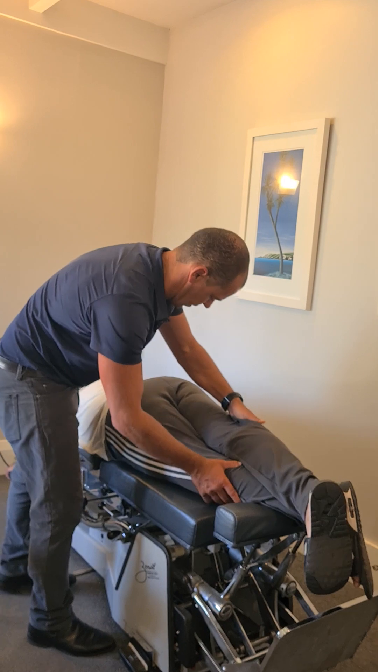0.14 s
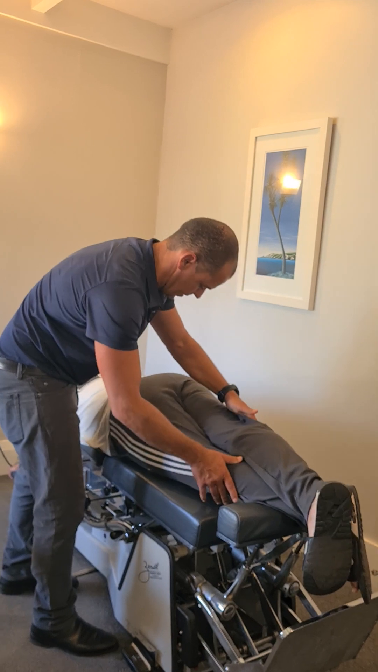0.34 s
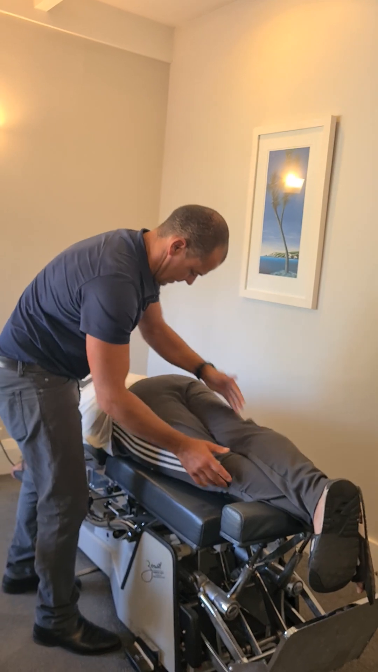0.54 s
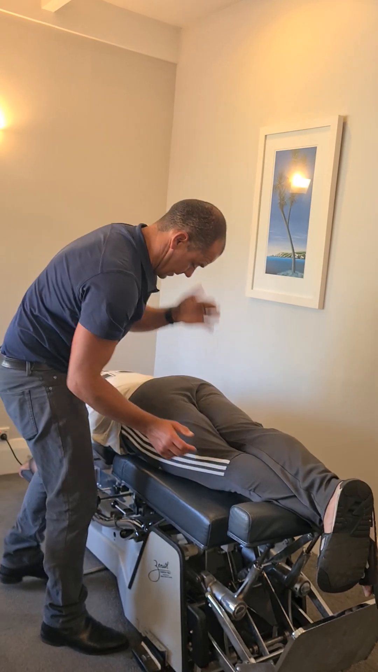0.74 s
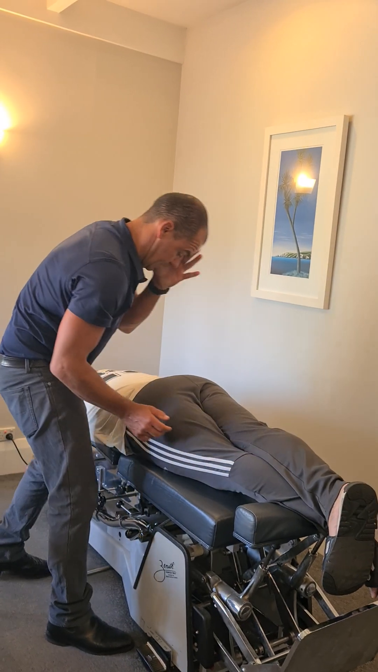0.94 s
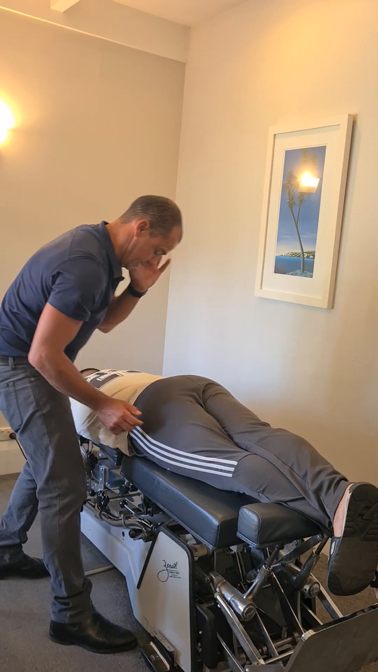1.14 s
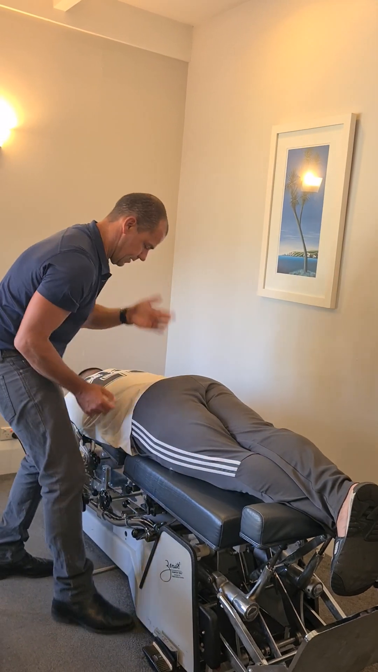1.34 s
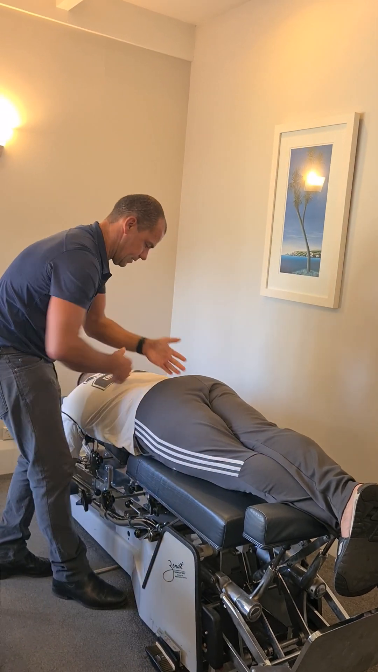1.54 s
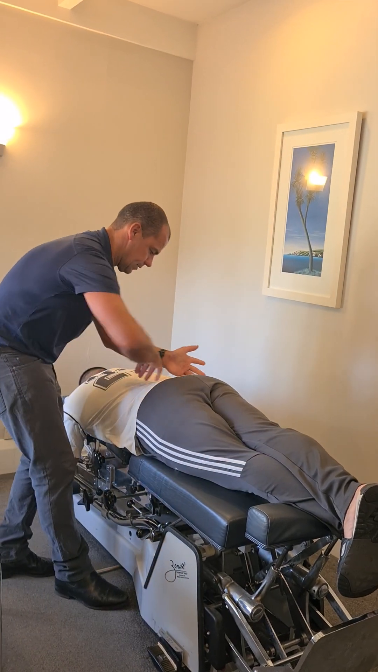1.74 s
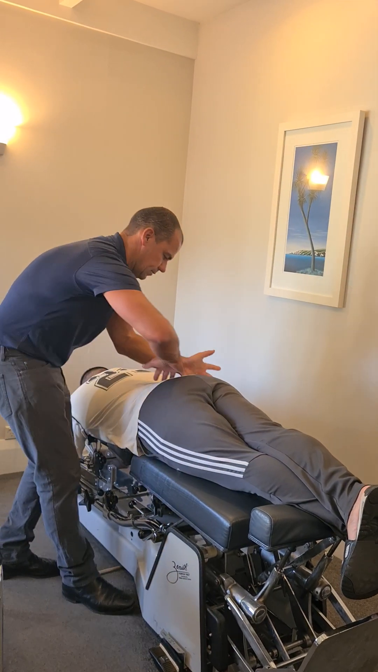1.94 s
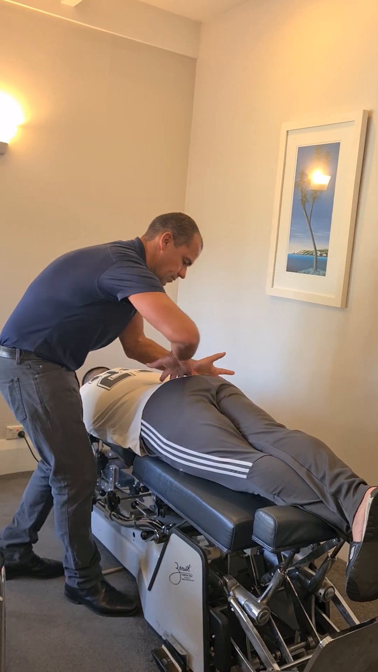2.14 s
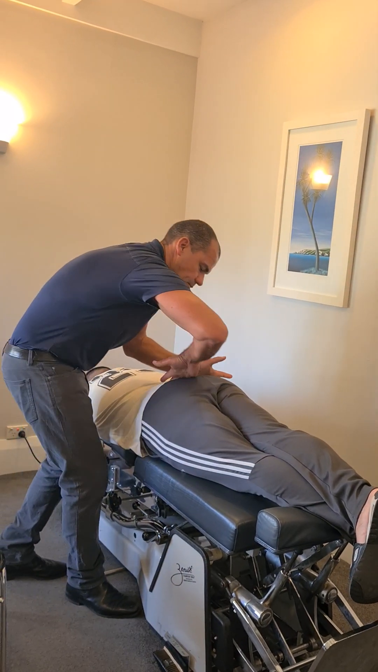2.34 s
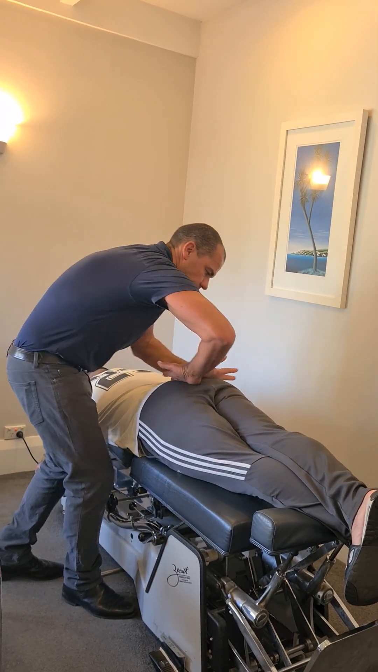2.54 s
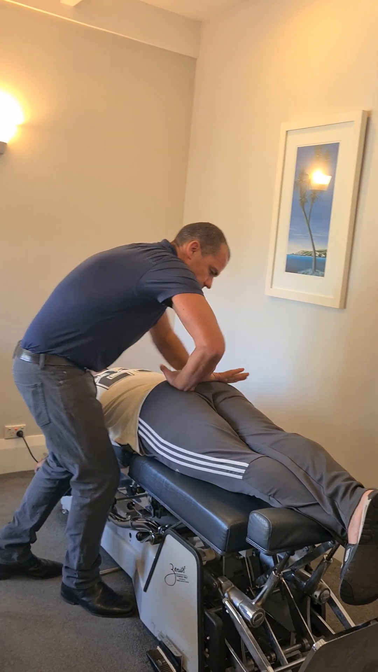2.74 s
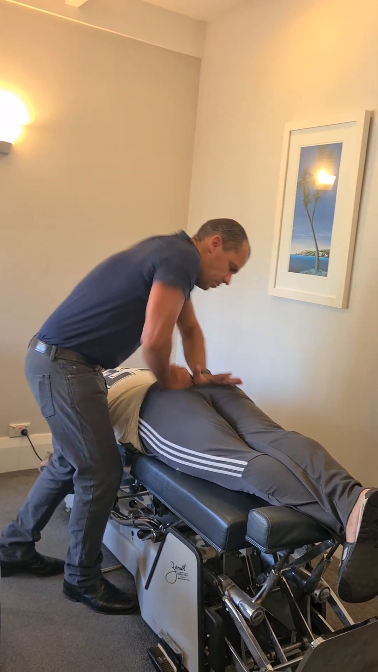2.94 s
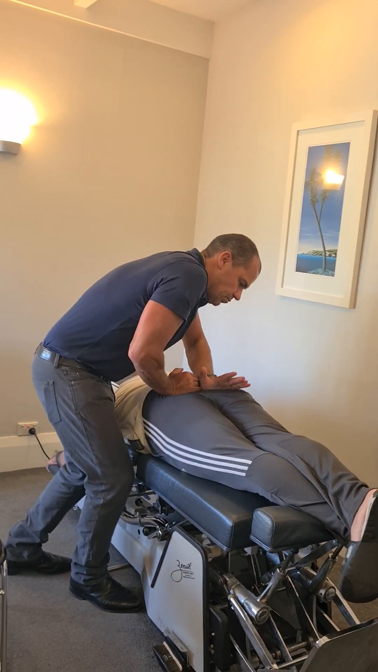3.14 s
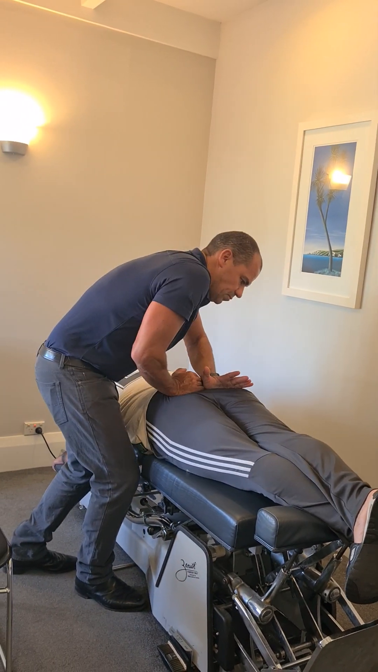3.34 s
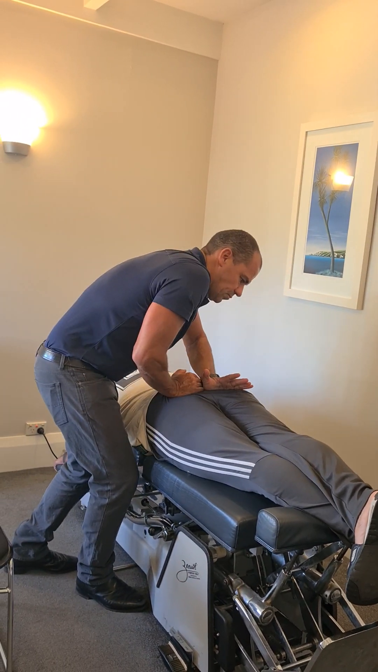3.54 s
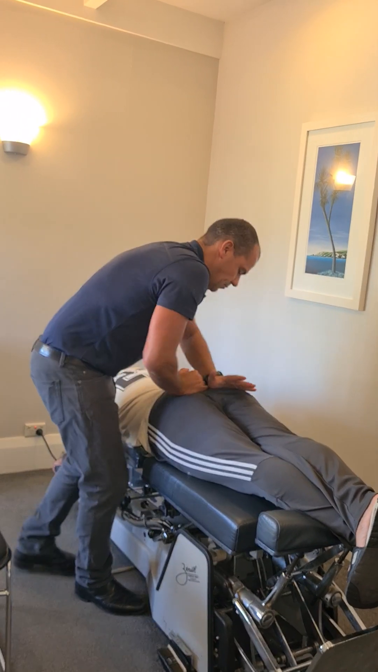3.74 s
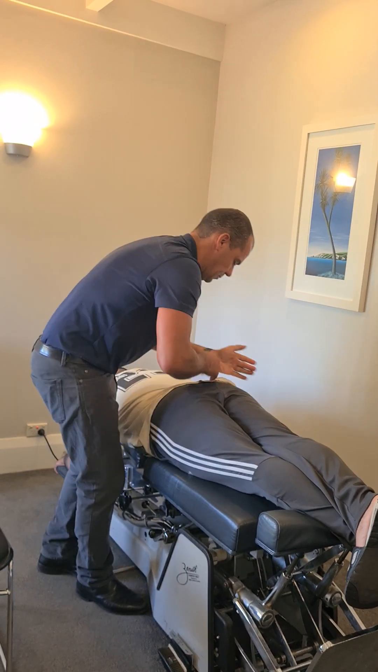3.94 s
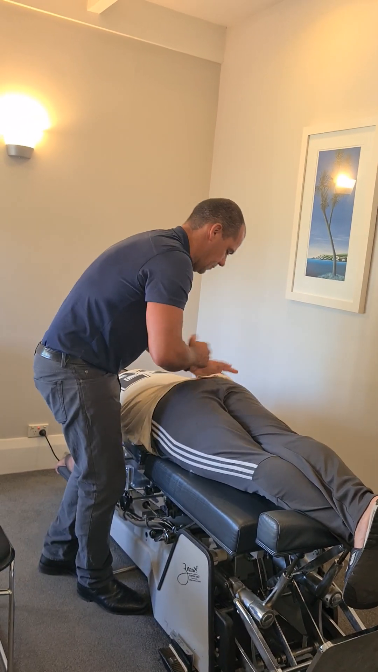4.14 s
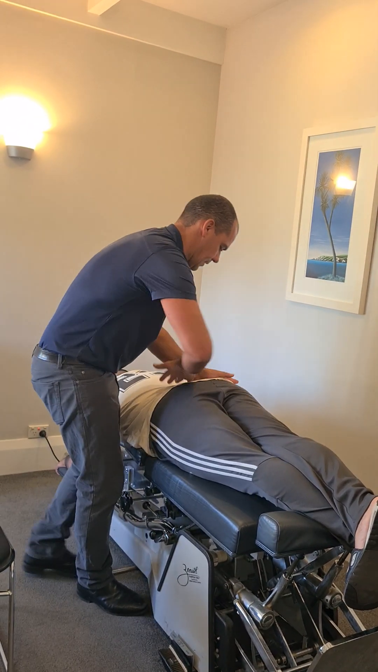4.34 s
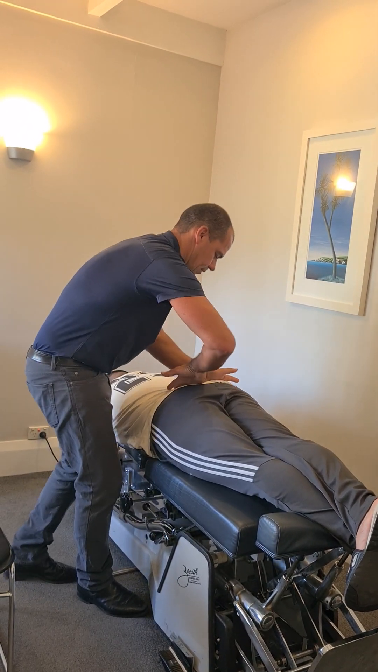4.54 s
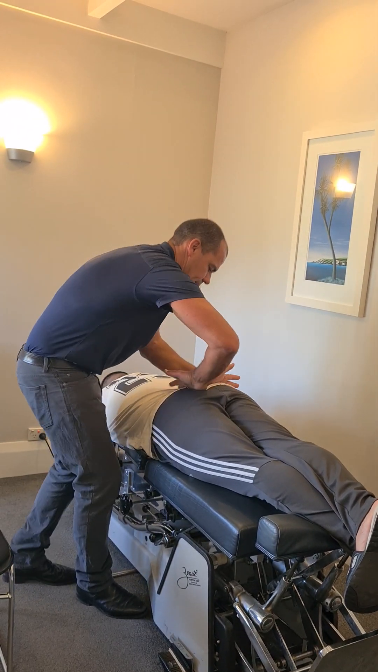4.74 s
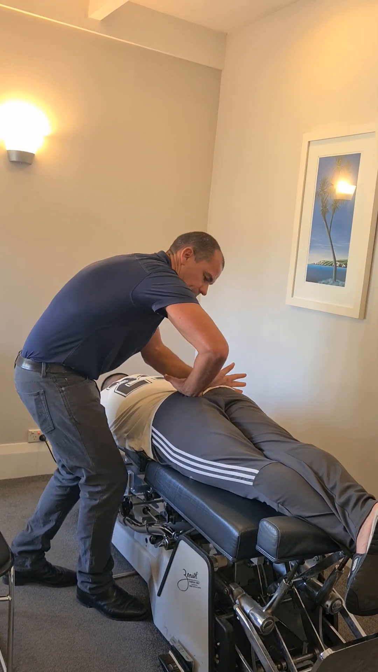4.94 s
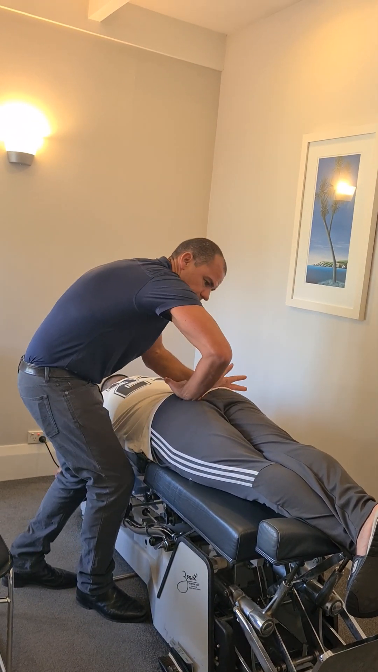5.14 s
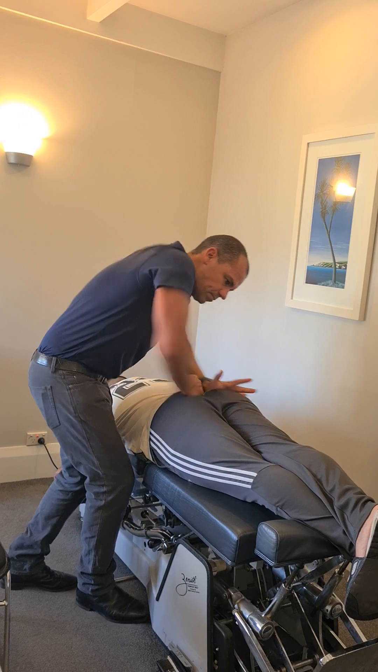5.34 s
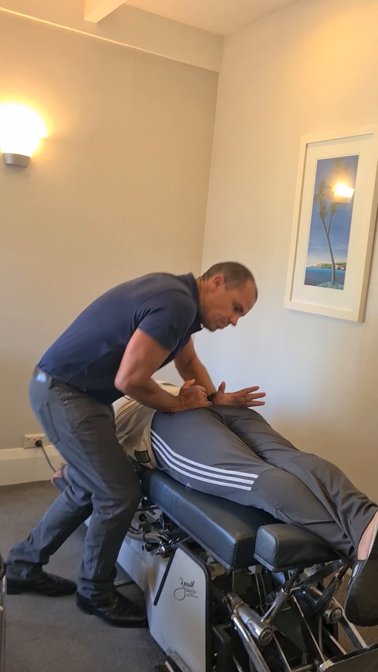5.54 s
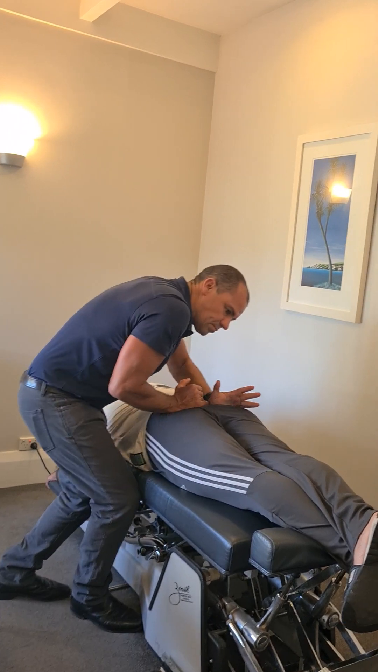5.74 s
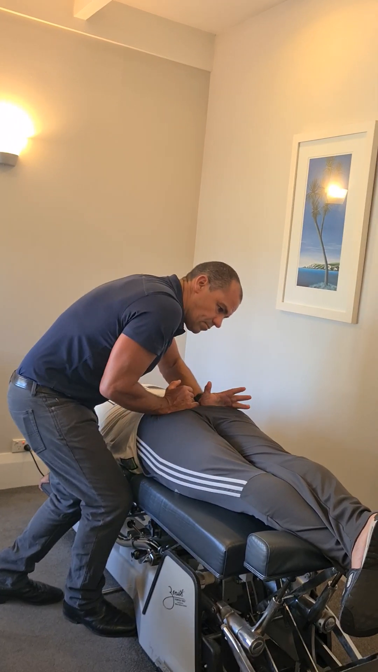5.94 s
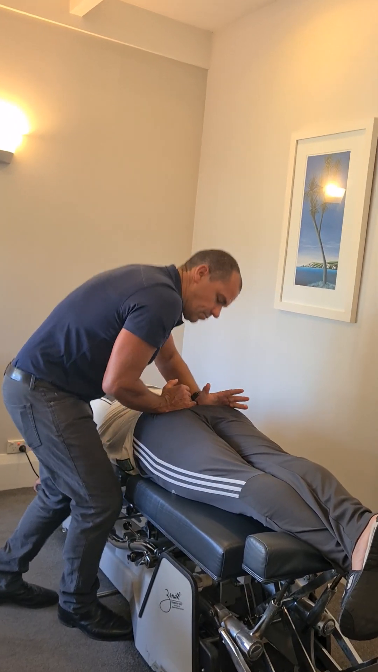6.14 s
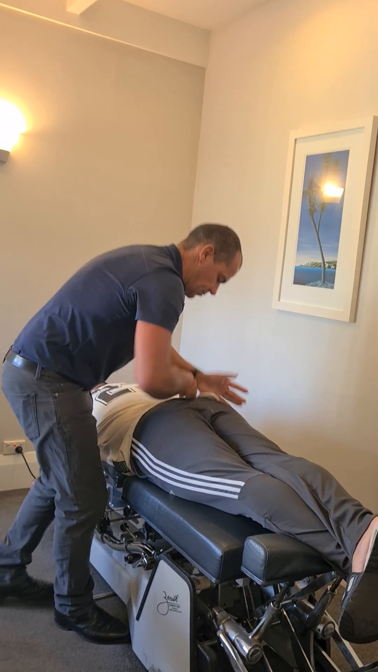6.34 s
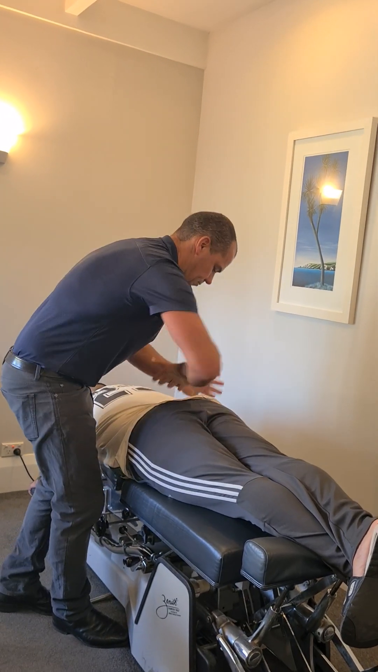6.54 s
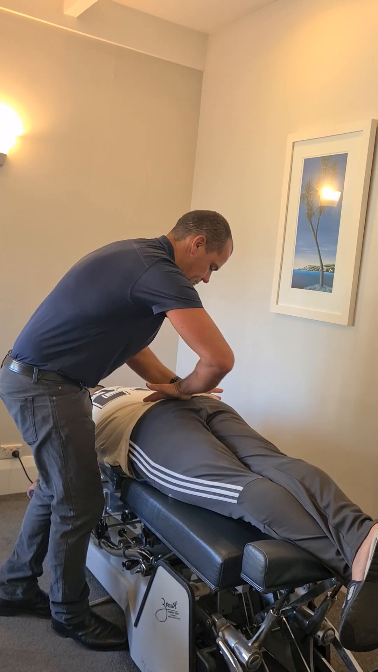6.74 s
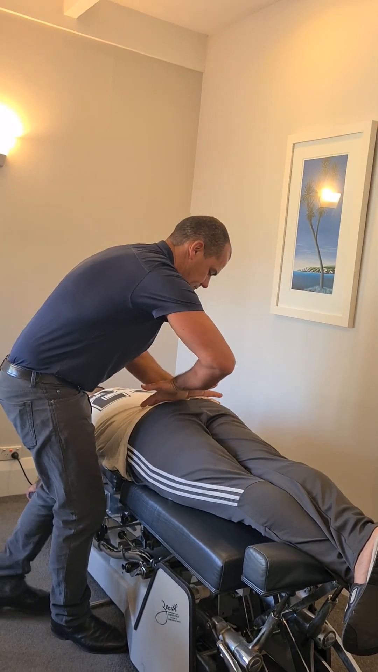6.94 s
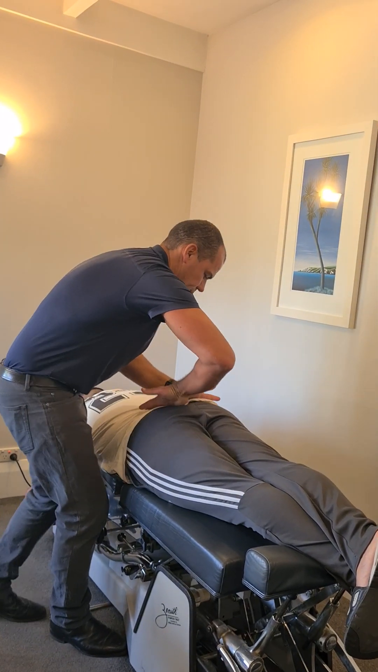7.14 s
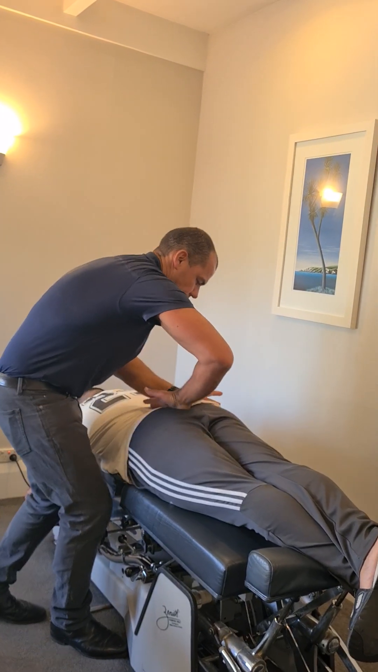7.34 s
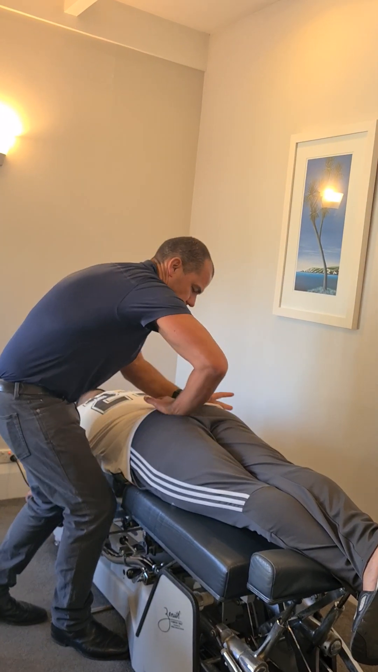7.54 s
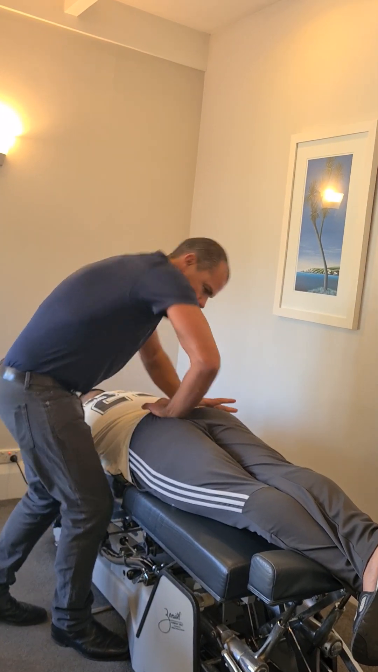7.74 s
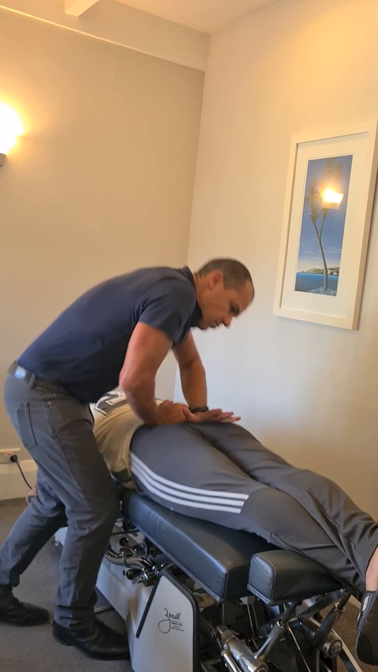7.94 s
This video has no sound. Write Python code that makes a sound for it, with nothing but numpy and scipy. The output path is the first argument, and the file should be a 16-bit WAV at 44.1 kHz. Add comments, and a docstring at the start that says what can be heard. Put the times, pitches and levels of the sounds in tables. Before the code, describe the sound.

Loud metal latch clack and dull thud, a sharp air hiss, then a hard crash of a dropping table section; the cycle repeats, first part quieter.

```python
"""A pneumatic drop table in a small room with soft ventilation noise and a faint hum, heard in stereo.
Three times an air cylinder cocks the padded section: a latch clacks, air spits, the section thuds on its stop,
then the cylinder vents with a hiss and its piston lands below. After the first two ventings the section crashes down.
Contacts are impulses with decaying chatter filtered by a resonant frame; air and soft rustles are coloured noise;
a deep resonance swells after heavy movements. All table sounds except that one pass through the room's response."""
import sys
import numpy as np
from scipy import signal
from scipy.fft import rfft, irfft
from scipy.io import wavfile
from scipy.ndimage import uniform_filter1d, minimum_filter1d

SR = 44100
rng = np.random.default_rng(int(sys.argv[2]) if len(sys.argv) > 2 else 0)


def to_wav(sig):
    """Store sig (one row per channel, or 1-D mono) as 16-bit WAV at the path in sys.argv[1].

    Samples outside -1..1 are clipped; the rate is SR.
    """
    pcm = np.clip(np.atleast_2d(sig), -1, 1) * 32767
    pcm = np.round(pcm).astype(np.int16)
    wavfile.write(sys.argv[1], SR, pcm.T)  # frames by channels


N = 351918
TIME = np.arange(N) / SR
SIZE = 32768  # samples in which a contact or a room response is built

# the section is cocked: latch_s, latch_db, air_wait_s, stroke_db, boom_db
COCKINGS = [(.307, -9.5, .047, -15, -17.5), (4.051, -21, .054, -22, -32.5),
            (6.66, -21.5, .061, -23.5, -38.5)]
# the cylinder vents: opens_s, open_duration_s, jet_db, port_db, whistle_hz
VENTINGS = [(.764, .91, -18, -29.5, 4000), (4.328, 0.82, -27.5, -40.5, 4750), (6.932, .795, -30, -40, 4620)]
# the piston lands at the bottom after each opening of the valve: start_s, level_db
PISTON_LANDINGS = [(1.118, -23), (4.626, -29.5), (7.214, -32.5)]
# the section falls on its stop: start_s, knock_db, clatter_db
SECTION_DROPS = [(3.0917, -7.5, -16.5), (5.5148, -9, -17)]
# spectrum of the latch and linkage metal: frequency_hz, relative_level_db
LATCH_COLOUR = [(50, -7), (130, -4.5), (280, 0), (430, -1.5), (800, -6.5), (1100, -4), (1900, -2.5),
                (2600, -14), (4800, -12), (7000, -24), (9000, -19), (11000, -29.5), (16000, -28.5)]
# spectrum of the section or piston meeting a stop: frequency_hz, relative_level_db
THUD_COLOUR = [(50, -0.5), (90, 1.5), (140, -5), (260, 6), (420, 2.5), (680, 3.5), (880, -15),
               (2000, -27.5), (5000, -44), (16000, -64)]
# spectrum of the cushion meeting the frame: frequency_hz, relative_level_db
BUMP_COLOUR = [(40, -12), (85, -5.5), (125, -5.5), (190, -1.5), (280, -8), (400, -10), (800, -25),
               (2000, -41.5), (16000, -72)]


def amp(db):
    """Decibels to amplitude ratio: 20 dB is a factor of ten."""
    return 10 ** (np.asarray(db) / 20)


def unit(x):
    """Normalization to a root-mean-square amplitude of 1."""
    return x / np.sqrt(np.mean(x ** 2))


def bins(size):
    """Discrete Fourier frequencies in Hz, kept at or above 1 Hz so that logarithms exist."""
    return np.maximum(np.arange(size // 2 + 1) * SR / size, 1)


def along(points, hz):
    """Linear interpolation of a (frequency, value) table on a logarithmic frequency axis."""
    at_hz, value = np.transpose(points)
    return np.interp(np.log(hz), np.log(at_hz), value)


def walk(rate):
    """Slow random modulation: levels drawn at a rate in Hz, joined by a moving average, rms 1."""
    hold = int(SR / rate)
    steps = np.repeat(rng.standard_normal(N // hold + 1), hold)
    return unit(uniform_filter1d(steps, hold)[:N])


def noise(colour):
    """Spectral shaping: white noise filtered to a tabulated colour, rms 1."""
    spectrum = rfft(rng.standard_normal(N))
    return unit(irfft(spectrum * amp(along(colour, bins(N))), N))


def ringing(hz, width_hz):
    """Resonance: noise in a narrow Lorentzian band, its width taken at half amplitude, rms 1."""
    detuning = (bins(N) - hz) / width_hz * 2
    return unit(irfft(rfft(rng.standard_normal(N)) / (1 + detuning ** 2), N))


def diffuse(mid, side, apart_hz=750):
    """Diffuse-field coherence: two microphones agree in the bass and are unrelated in the treble."""
    size = len(mid)
    alike = 1 / (1 + (bins(size) / apart_hz) ** 2)
    common = rfft(mid) * np.sqrt((1 + alike) / 2)
    opposed = rfft(side) * np.sqrt((1 - alike) / 2)
    return irfft(common + np.array([[1], [-1]]) * opposed, size)


def even(x, size):
    """Spectral whitening: energy levelled over a span of bins, so that every band carries the same."""
    spectrum = rfft(x)
    local_power = uniform_filter1d(np.abs(spectrum) ** 2, size)
    return irfft(spectrum / np.sqrt(local_power + 1e-18))


def add(track, s, sound):
    """Superposition: a sound is summed into a track from a given second."""
    start = max(int(s * SR), 0)
    track[start:start + len(sound)] += sound[:N - start]


def reflections(early_db, early_s):
    """Reverberation: energy boosted early, then an exponential tail whose decay depends on frequency."""
    # reverberation time of the room, a 60 dB decay: frequency_hz, t60_s
    t60 = [(60, 1), (200, .5), (500, 0.39), (1500, 0.45), (4000, 0.34), (8000, .29), (16000, .21)]
    t, hz = np.arange(SIZE) / SR, bins(SIZE)
    field = rfft(rng.standard_normal(SIZE))
    octaves = np.log2(np.geomspace(40, 16000, 10))
    tail = 0
    # overlapping triangular bands, each with its own decay
    for octave, share in zip(octaves, np.eye(len(octaves))):
        band = irfft(field * np.interp(np.log2(hz), octaves, share))
        tail = tail + band * np.exp(-np.log(1000) * t / along(t60, 2 ** octave))
    return even(tail * (1 + amp(early_db) * np.exp(-t / early_s)), size=60)


def room(direct_db=-5, shade_hz=1800, early_db=-6, early_s=0.045):
    """Shadowing: cushions over the mechanism dull its direct sound, so treble arrives mainly by the walls."""
    impulse = np.arange(SIZE) == 0
    direct = signal.lfilter(*signal.butter(1, shade_hz, fs=SR), impulse)
    mid = even(reflections(early_db, early_s) + amp(direct_db) * direct, size=60)
    return diffuse(mid, reflections(early_db, early_s))[:, :SIZE // 2]


def blow(colour, db, tilt_db, chatter_s, chatter_db, frame=1):
    """Impact excitation of a resonant body: one contact and its dying chatter, filtered by the frame.

    Before the room, db is the rms if all the energy lay in a twentieth of a second; tilt_db is per octave,
    chatter_db is chatter energy against the contact, and frame multiplies the gains of the frame's peaks in dB.
    """
    # resonances of the steel frame and its side panels: centre_hz, width_hz, gain_db at frame 1
    frame_modes = [(141, 61, 9.5), (250, 110, 3.5), (523, 19, 3.5), (527, 19, 2.5), (578, 51, 3.5),
                   (653, 93, 3.5), (970, 54, 5), (1006, 40, 1), (1124, 93, 5.5), (1500, 26, -7),
                   (1665, 98, 3), (1770, 50, 2), (1948, 47, 5.5), (3000, 100, -2)]
    t, hz = np.arange(SIZE) / SR, bins(SIZE)
    chatter = unit(rng.standard_normal(SIZE) * np.exp(-t / chatter_s))
    force = chatter * amp(chatter_db) / np.sqrt(SIZE)
    force[0] += 1
    peaks_db = sum(gain_db / (1 + (2 * (hz - centre) / width) ** 2) for centre, width, gain_db in frame_modes)
    body_db = along(colour, hz) + frame * peaks_db + tilt_db * np.log2(hz)
    cepstrum = irfft(np.log(amp(body_db)))
    # minimum phase: folding the cepstrum makes the body ring only after the contact
    body = np.exp(rfft(2 * cepstrum[:SIZE // 2], SIZE) - cepstrum[0])
    sound = irfft(rfft(even(force, size=40)) * body)[:SIZE // 2]
    return sound * amp(db) * np.sqrt(SR / 20 / np.sum(sound ** 2))


def room_tone(start_db=-45.5, ease_db_per_s=0.99):
    """Diffuse broadband noise: soft ventilation, partly coherent between microphones, that slowly fades."""
    # spectrum of the ventilation: frequency_hz, relative_level_db
    colour = [(20, -11), (45, 1), (75, -4), (105, -3), (170, -4), (255, -5.5), (330, -10.5), (600, -14),
              (1100, -18), (2000, -26.5), (3000, -35.5), (6000, -49.5), (16000, -63)]
    return diffuse(noise(colour), noise(colour)) * amp(start_db - ease_db_per_s * TIME)


def hum(width_hz=3):
    """Narrowband noise: the ventilation's few faint tones, slightly unsteady from their finite bandwidth."""
    # tones of the ventilation: pitch_hz, level_db
    tones = [(96.9, -55.5), (242.2, -61), (597.5, -71.5)]
    return sum(amp(db) * ringing(hz, width_hz) for hz, db in tones)


def boom(wander_hz=1.4, waver_db=1.5, drop_db=-29, sink_db=-33, rest_db=-53, sag_hz=5):
    """Low-frequency resonance: heavy movements swell a deep tone, lower as it swells, that then sways on."""
    # weight shifts on the floor and the table: start_s, level_db
    weight_shifts = [(1.44, -32), (2.53, -32.5), (3.98, -33), (6.56, -30.5)]
    rest_hz, lag_s, swell_s = 48.3, 0.12, .05
    sway_db, sway_fall_db_per_s = -14, 12.5  # sway level relative to the swell
    stirs = [(s + wait_s, db) for s, _, wait_s, _, db in COCKINGS]
    stirs += [(s, drop_db) for s, *_ in SECTION_DROPS] + list(weight_shifts)
    stirs += [(s, sink_db) for s, *_ in list(VENTINGS) + list(PISTON_LANDINGS)]
    power = amp(rest_db) ** 2
    hz = rest_hz + wander_hz * walk(24)
    for s, db in stirs:
        age = TIME - s - lag_s
        swell = np.exp(-(age / swell_s) ** 2)
        sway = (age > 0) * (1 - swell) * amp(sway_db - sway_fall_db_per_s * np.abs(age))
        power = power + (amp(db) * (swell + sway)) ** 2
        hz = hz - sag_hz * swell
    tone = np.sin(2 * np.pi * np.cumsum(hz) / SR)
    return unit(tone * amp(waver_db * walk(19))) * np.sqrt(power)


def rustles(grain_db=2.5, fade_s=0.068, rest_db=-83):
    """Amplitude-modulated noise: clothes rub unevenly, and a like rustle leads into each drop; faint in between."""
    # spectrum of the rustle: frequency_hz, relative_level_db
    rustle_colour = [(300, 4), (1500, 7.5), (2800, -3.5), (4500, -2.5), (6500, -18), (8500, -11),
                     (11000, -25), (16000, -28.5)]
    # clothes rub, save at 2.943 s and 5.405 s, where a soft rustle leads into a drop: start_s, end_s, level_db
    spans = [(0, 0.353, -56.5), (1.72, 3.1, -61.5), (2.943, 3.133, -57), (5.405, 5.558, -47.5),
             (7.871, 8.05, -59.5)]
    rustling = sum(amp(db) * np.clip(np.minimum(TIME - start, end - TIME) / fade_s, 0, 1)
                   for start, end, db in spans)
    return noise(rustle_colour) * (rustling + amp(rest_db)) * amp(grain_db * walk(45))


def ticks(chatter_s=0.024):
    """Light metal impacts, mostly chatter: a faint metallic tail as the sound begins, then ticks of the linkage."""
    # the metallic tail at the beginning, then the linkage ticks: start_s, level_db, tilt_db_per_octave
    metal_ticks = [(.005, -41, -2), (1.430, -43.5, -2.5), (4.923, -55.5, .5), (6.353, -57, 1.5),
                   (6.597, -42, -3), (7.505, -53, -1)]
    track = np.zeros(N)
    for s, db, tilt_db in metal_ticks:
        add(track, s, blow(LATCH_COLOUR, db, tilt_db, chatter_s, chatter_db=23.0))
    return track


def sinking(jolt_db=-7, rebound_db=-4, rattle_db=-13, cushion_db=-10):
    """Successive impacts: the valve jolts the cushion, the piston lands, section and rattle follow, cushion bounces."""
    # the loaded cushion sags onto the frame as the air leaves: start_s, level_db, tilt_db_per_octave
    sags = [(.805, -25.5, -2.5), (4.39, -38.5, -4), (7.022, -26, -4)]
    rebound_s = 0.037  # between the landing piston, the section with its rattle, and the cushion
    track = np.zeros(N)
    for s, _, jet_db, *_ in VENTINGS:
        add(track, s, blow(BUMP_COLOUR, jet_db + jolt_db, tilt_db=3.0, chatter_s=.015, chatter_db=-2.5))
    for s, db, tilt_db in sags:
        add(track, s, blow(BUMP_COLOUR, db, tilt_db, chatter_s=.015, chatter_db=-3))
    for s, db in PISTON_LANDINGS:
        piston = blow(THUD_COLOUR, db, tilt_db=0, chatter_s=.016, chatter_db=2.5)
        section = blow(BUMP_COLOUR, db + rebound_db, tilt_db=2.56, chatter_s=0.011, chatter_db=-0.5)
        rattle = blow(LATCH_COLOUR, db + rattle_db, tilt_db=-0.8, chatter_s=0.0059, chatter_db=38.0)
        cushion = blow(BUMP_COLOUR, db + cushion_db, tilt_db=-2.5, chatter_s=0.0061, chatter_db=0)
        add(track, s, piston)
        add(track, s + rebound_s, section + rattle)
        add(track, s + 2 * rebound_s, cushion)
    return track


def venting(flutter_db=2.8, opening_s=0.011, closing_s=0.037,
            whistle_db=-11, whistle_at_s=.2, whistle_spread_s=.13):
    """Jet noise: the hiss fades with pressure and a whistle swells; the port sings over a leak until the valve shuts."""
    # spectrum of the free jet: frequency_hz, relative_level_db
    jet_colour = [(150, -12.5), (500, -5.5), (1050, -3.5), (1600, -3.5), (2900, -1), (4500, 4.5), (6000, 2),
                  (7000, -1), (8500, -0.5), (10500, -5), (13500, 4), (16000, -1)]
    # hose and valve body ringing in the jet: centre_hz, width_hz, level_db relative to the jet noise
    hose_modes = [(496.5, 16, -23), (704, 15, -22.5), (1027, 25, -22.5), (4320, 90, -19.5)]
    # spectrum of the exhaust port: frequency_hz, relative_level_db
    port_colour = [(500, -21.5), (2000, -4.5), (3200, -6.5), (4100, 3), (5200, -1.5), (6700, -19.5),
                   (9200, -12.5), (11000, -27.5), (14000, -10.5), (16000, -8)]
    # narrow resonances of the port: centre_hz, width_hz, level_db relative to the port noise
    port_modes = [(4280, 30, -15), (4480, 40, -15.5)]
    jet_hold_s, jet_fall_db_per_s = 0.025, 74
    port_rise_s, port_sag_db_per_s = .07, 19
    port_lag_s, port_fall_db_per_s = 0.013, 98  # steeper fall once the piston has landed
    leak_db = -22.5
    jet = noise(jet_colour) + sum(amp(db) * ringing(hz, width) for hz, width, db in hose_modes)
    port = noise(port_colour) + sum(amp(db) * ringing(hz, width) for hz, width, db in port_modes)
    track = np.zeros(N)
    for (opens, open_s, jet_db, port_db, whistle_hz), (lands, _) in zip(VENTINGS, PISTON_LANDINGS):
        age = np.maximum(TIME - opens, 0)
        landed_age = np.maximum(TIME - lands - port_lag_s, 0)
        valve = np.clip(np.minimum(age / opening_s, (open_s - age) / closing_s), 0, 1)
        pressure = amp(-jet_fall_db_per_s * np.maximum(age - jet_hold_s, 0))
        flow_db = -port_sag_db_per_s * age - port_fall_db_per_s * landed_age
        flow = np.minimum(age / port_rise_s, 1) * amp(flow_db) + amp(leak_db)
        whistle_swell = np.exp(-((age - whistle_at_s) / whistle_spread_s) ** 2)
        whistle = ringing(whistle_hz, width_hz=35) * amp(whistle_db) * whistle_swell
        track += valve * (amp(jet_db) * pressure * jet + amp(port_db) * (flow * port + whistle))
    return track * amp(flutter_db * walk(40))


def cocking(spit_db=-5, bump_db=-3, stop_db=-2.0, settle_db=-2):
    """Impact chain: latch clacks, air spits and jolts the cushion, then piston and section thud on the top stop."""
    # spectrum of the air burst: frequency_hz, relative_level_db
    spit_colour = [(300, -9.5), (1500, 2), (3000, -2.5), (5000, -1.5), (7500, -5), (10500, -5.5),
                   (13500, -10.5), (16000, 0.5)]
    stroke_s, settle_s = .047, .014  # the piston's travel to its top stop; the section follows it
    track = np.zeros(N)
    for s, latch_db, wait_s, db, _ in COCKINGS:
        air_s = s + wait_s
        stop_s = air_s + stroke_s
        latch = blow(LATCH_COLOUR, latch_db, tilt_db=-0.7, chatter_s=.006, chatter_db=5.5, frame=1.2)
        spit = blow(spit_colour, db + spit_db, tilt_db=-0.8, chatter_s=0.013, chatter_db=13, frame=0)
        jolt = blow(BUMP_COLOUR, db + bump_db, tilt_db=2.5, chatter_s=0.013, chatter_db=3.5)
        piston = blow(THUD_COLOUR, db + stop_db, tilt_db=-0.85, chatter_s=0.0067, chatter_db=-3)
        section = blow(THUD_COLOUR, db + settle_db, tilt_db=3.0, chatter_s=0.0043, chatter_db=-1.5)
        add(track, s, latch)
        add(track, air_s, spit + jolt)
        add(track, stop_s, piston)
        add(track, stop_s + settle_s, section)
    return track


def drops(clatter_lag_s=.015):
    """Repeated impact: the section lands with the same hard dull knock; the steel linkage clatters just after."""
    # spectrum of the section on its stop: frequency_hz, relative_level_db
    knock_colour = [(40, -25), (80, -16), (130, -3.5), (300, 0.5), (600, 3), (800, -5), (1100, -4),
                    (1900, -7.5), (2600, -20), (5000, -25.5), (9000, -30.5), (16000, -35.5)]
    # spectrum of the steel linkage: frequency_hz, relative_level_db
    clatter_colour = [(200, -14.5), (600, 9.5), (1200, -1.5), (2500, 0.5), (4500, -0.5), (7000, -7.5),
                      (9000, -6.5), (11000, -14.5), (16000, -13)]
    knock = blow(knock_colour, 0, 0, chatter_s=.007, chatter_db=-12.5, frame=1.4)
    clatter = blow(clatter_colour, 0, 0, chatter_s=.009, chatter_db=0, frame=1.2)
    track = np.zeros(N)
    for s, knock_db, clatter_db in SECTION_DROPS:
        add(track, s, amp(knock_db) * knock)
        add(track, s + clatter_lag_s, amp(clatter_db) * clatter)
    return track


def scene():
    """Convolution: contacts, air and rustles share one room response; boom, hum and room tone are added outside it."""
    table = rustles() + ticks() + sinking() + venting() + cocking() + drops()
    in_room = signal.fftconvolve(table[None], room(), axes=1)[:, :N]
    return room_tone() + hum() + boom() + in_room


def record(dry):
    """Transduction: ports colour each side, a look-ahead limiter holds the peaks, and a low-pass cuts the top."""
    # colour difference of the two microphone ports: frequency_hz, left_minus_right_db
    port_difference = [(300, -0.15), (700, -0.1), (1300, -4), (2400, -3.5), (4400, -1), (8100, 2.5),
                       (15000, 1.5)]
    top_hz = 15800
    half_db = np.array([[.5], [-.5]]) * along(port_difference, bins(N))
    sound = irfft(rfft(dry) * amp(half_db), N)
    gain = np.minimum(1, 1 / (np.abs(sound).max(axis=0) + 1e-9))
    # the same gain on both sides, lowered ahead of each peak and smoothed
    gain = uniform_filter1d(minimum_filter1d(gain, size=301), size=301)
    low_pass = signal.ellip(10, .2, 80, top_hz, fs=SR, output="sos")
    return signal.sosfilt(low_pass, sound * gain)


dry = scene()
out = record(dry)
to_wav(out)
```